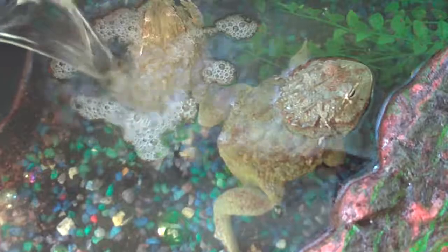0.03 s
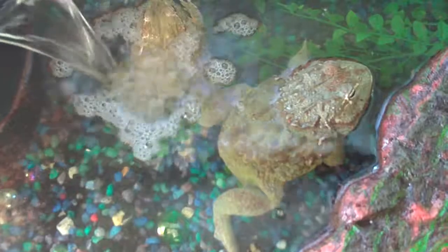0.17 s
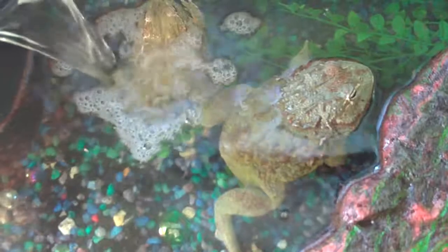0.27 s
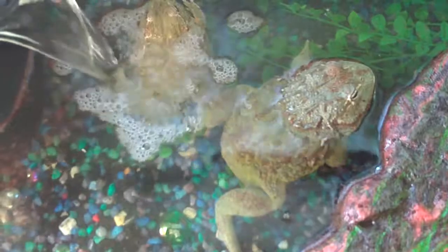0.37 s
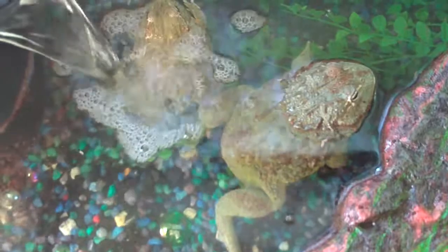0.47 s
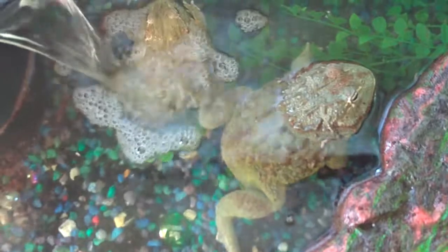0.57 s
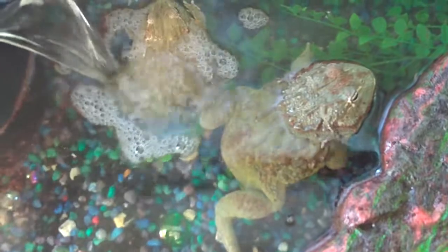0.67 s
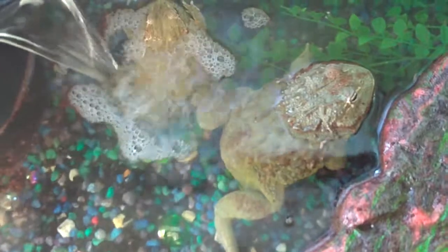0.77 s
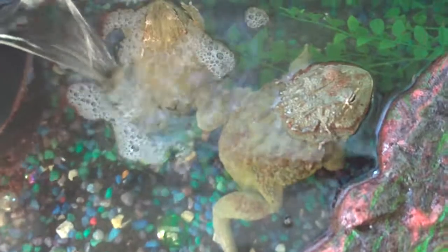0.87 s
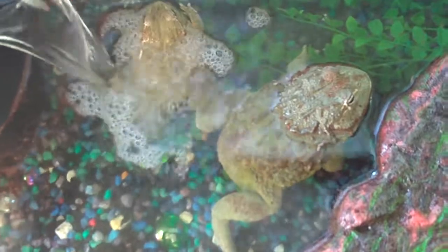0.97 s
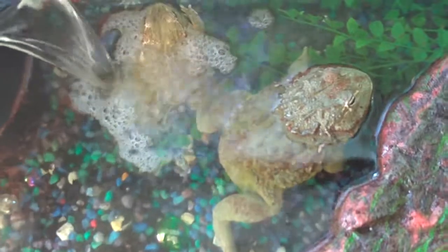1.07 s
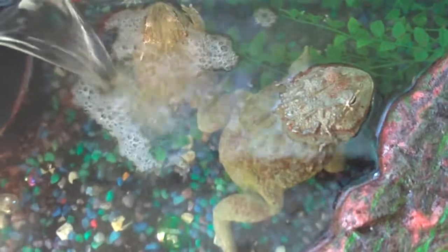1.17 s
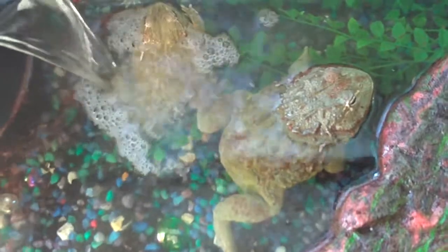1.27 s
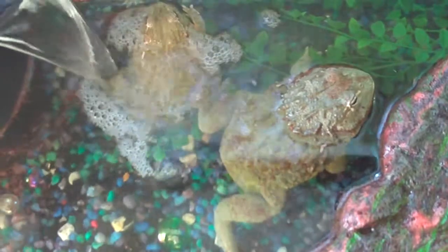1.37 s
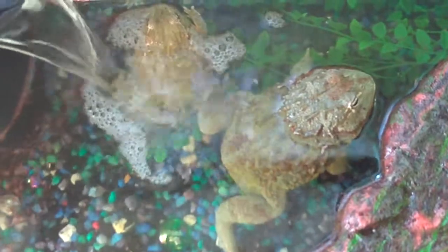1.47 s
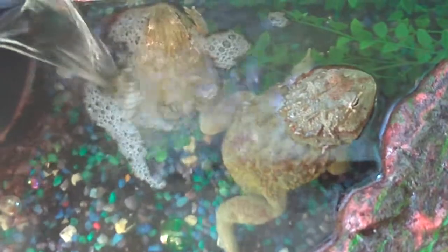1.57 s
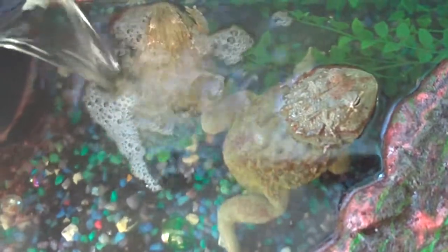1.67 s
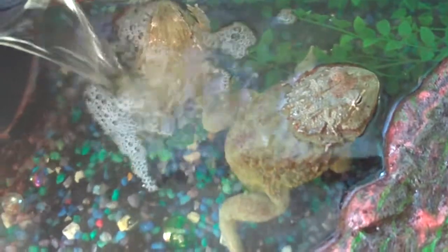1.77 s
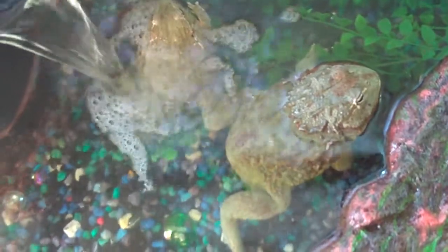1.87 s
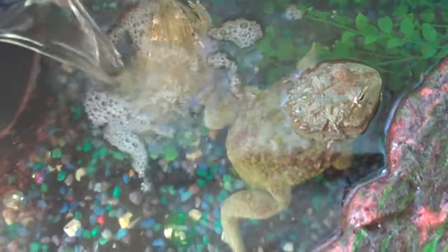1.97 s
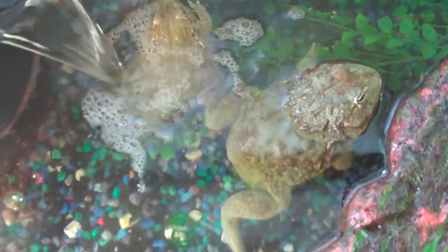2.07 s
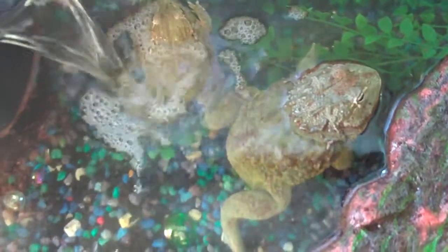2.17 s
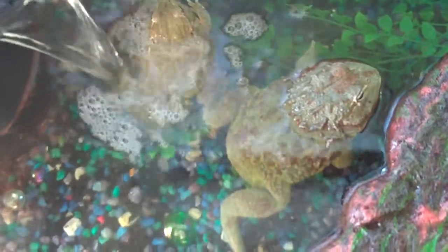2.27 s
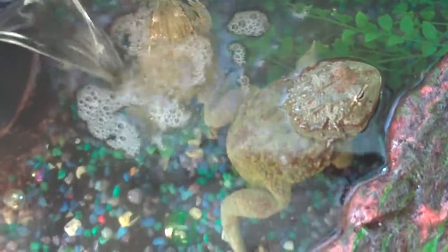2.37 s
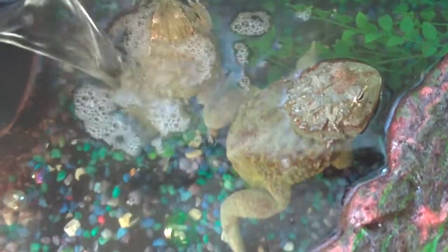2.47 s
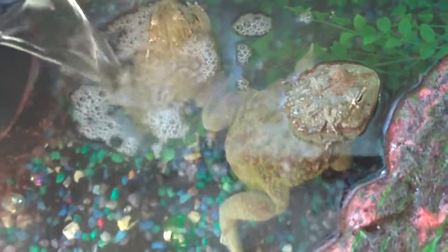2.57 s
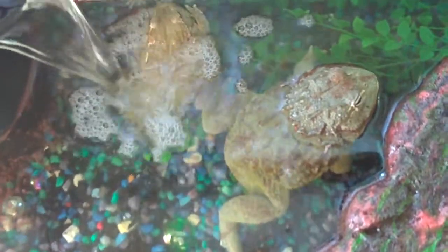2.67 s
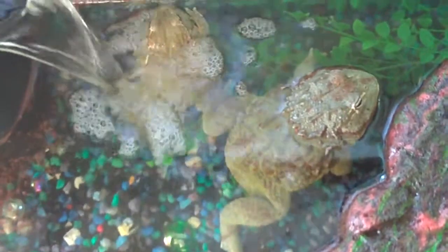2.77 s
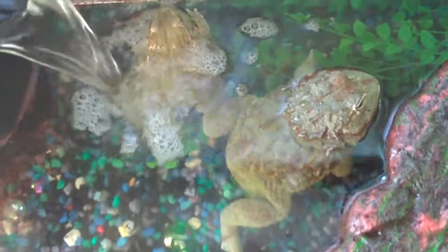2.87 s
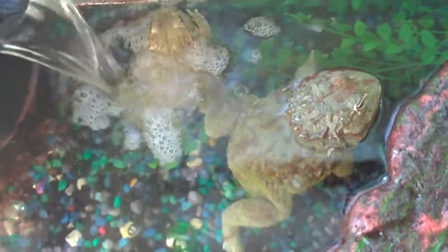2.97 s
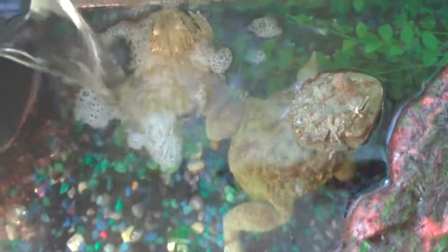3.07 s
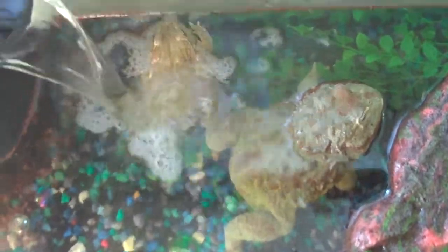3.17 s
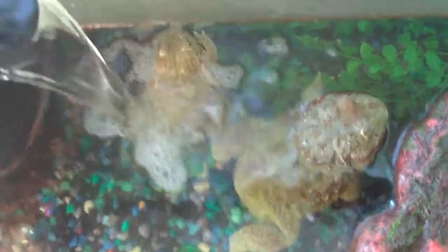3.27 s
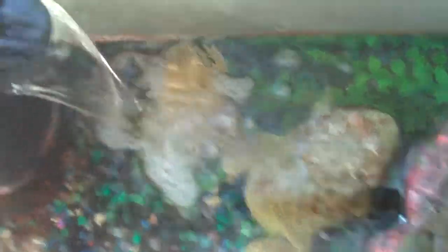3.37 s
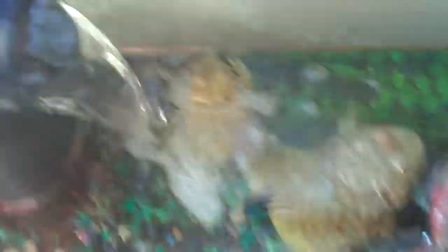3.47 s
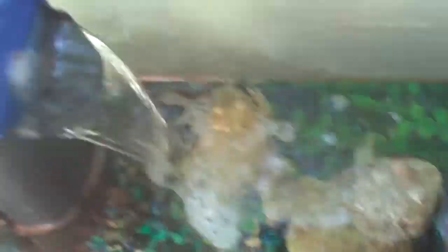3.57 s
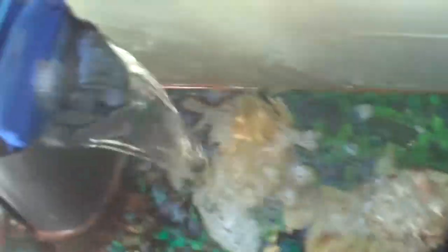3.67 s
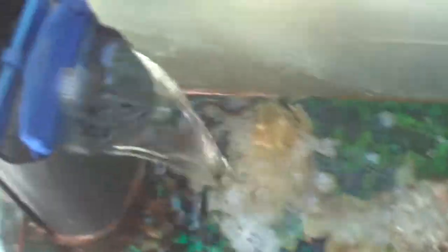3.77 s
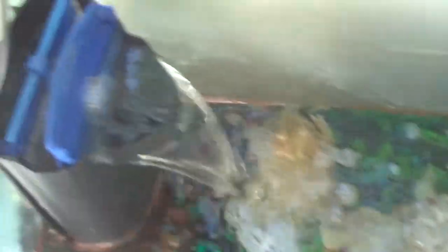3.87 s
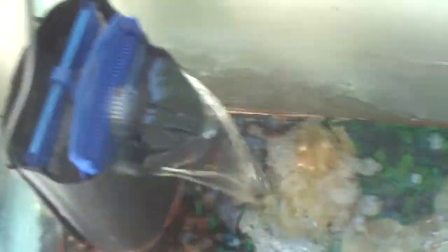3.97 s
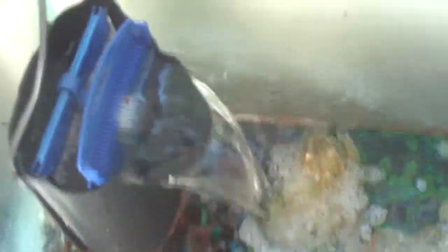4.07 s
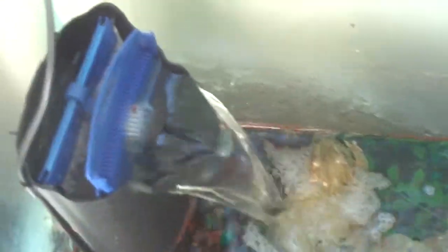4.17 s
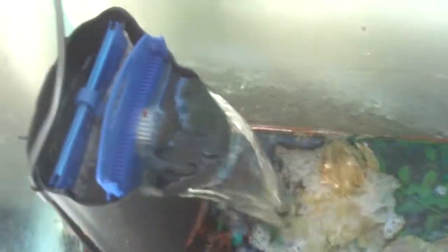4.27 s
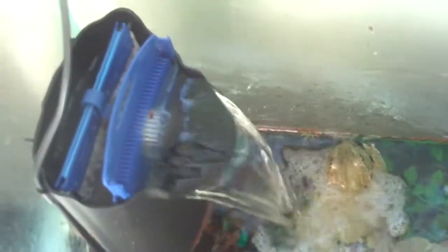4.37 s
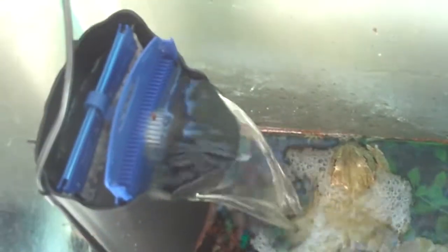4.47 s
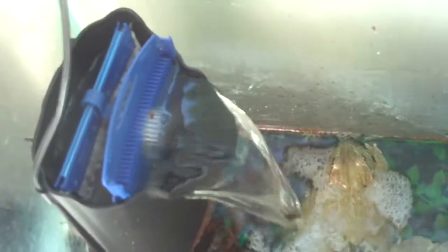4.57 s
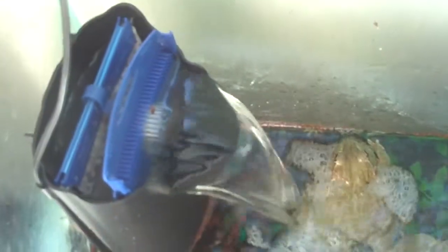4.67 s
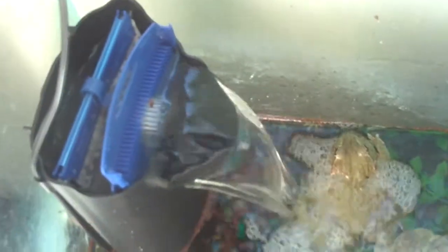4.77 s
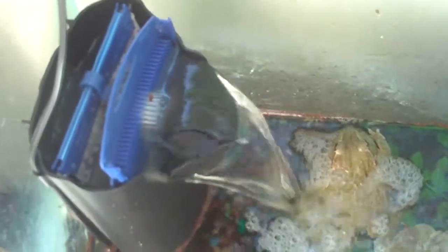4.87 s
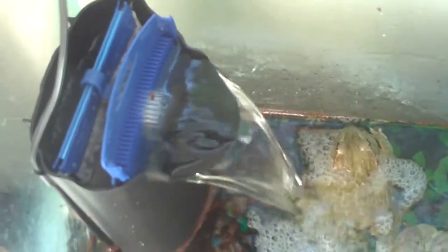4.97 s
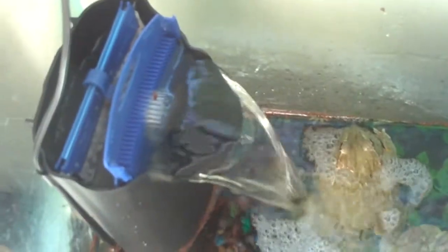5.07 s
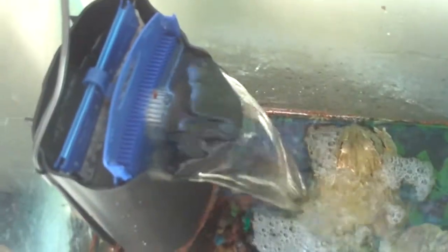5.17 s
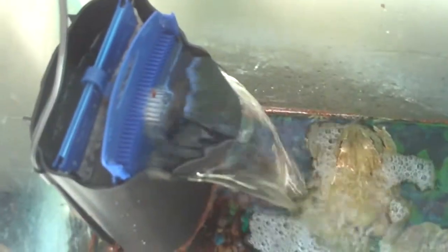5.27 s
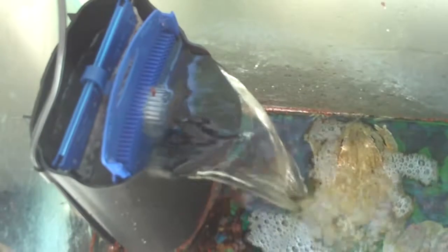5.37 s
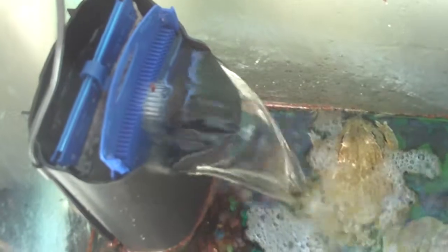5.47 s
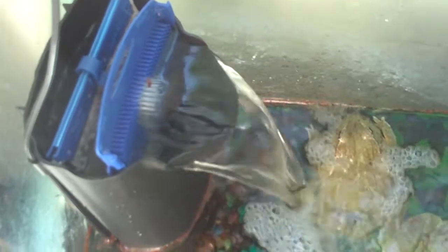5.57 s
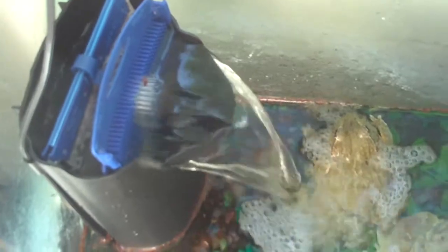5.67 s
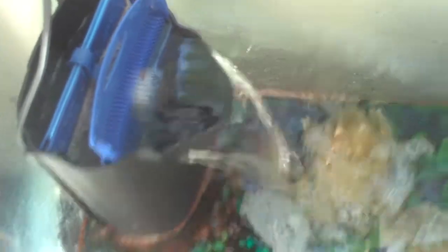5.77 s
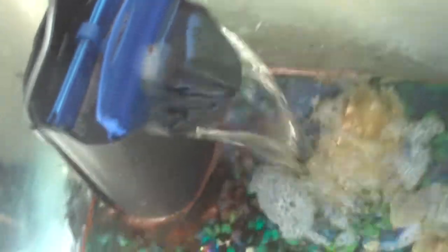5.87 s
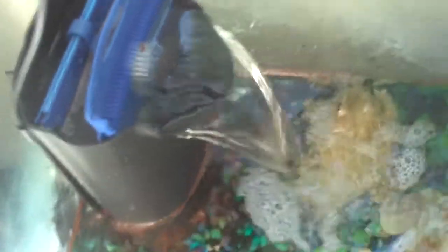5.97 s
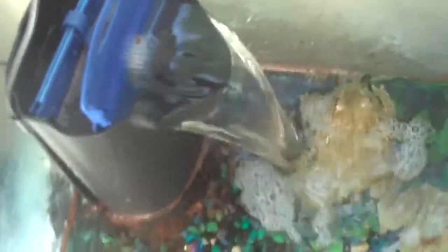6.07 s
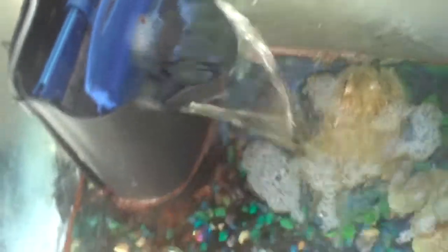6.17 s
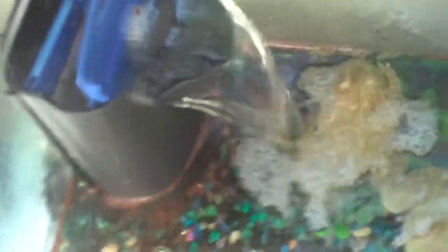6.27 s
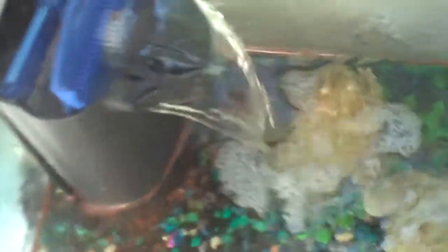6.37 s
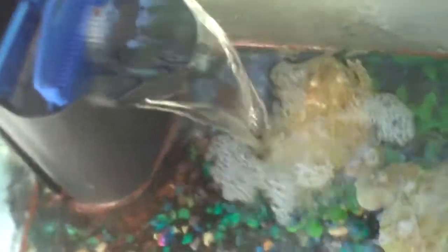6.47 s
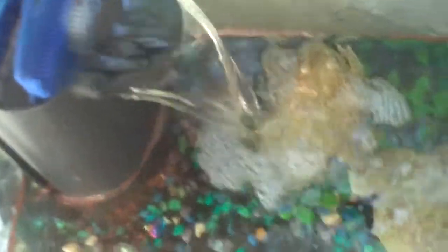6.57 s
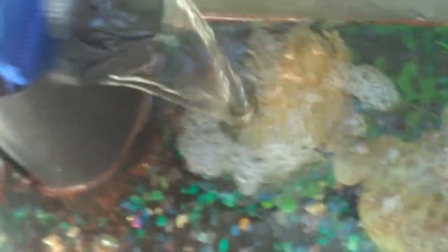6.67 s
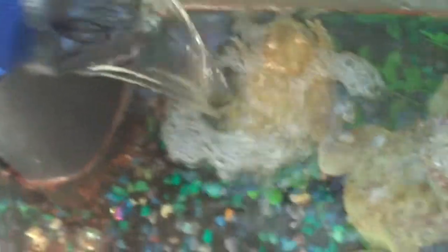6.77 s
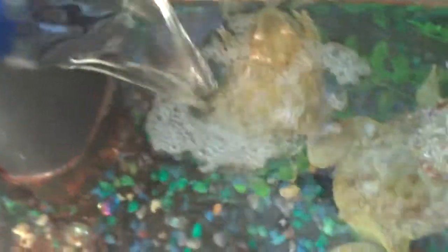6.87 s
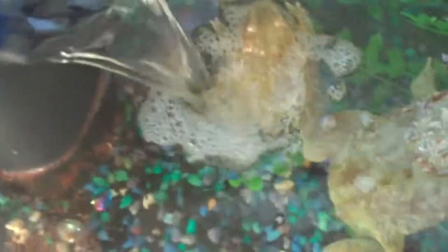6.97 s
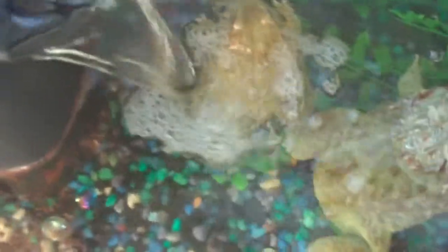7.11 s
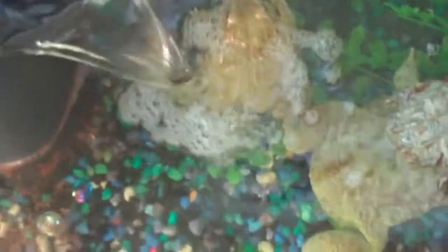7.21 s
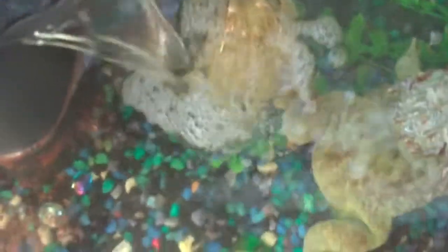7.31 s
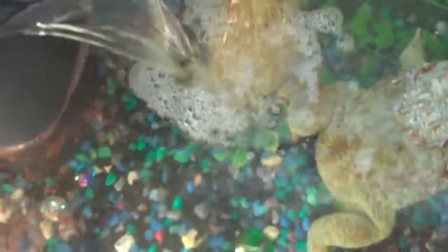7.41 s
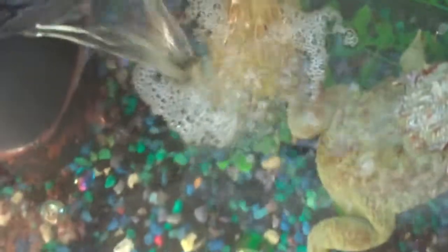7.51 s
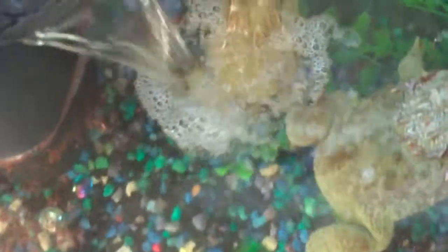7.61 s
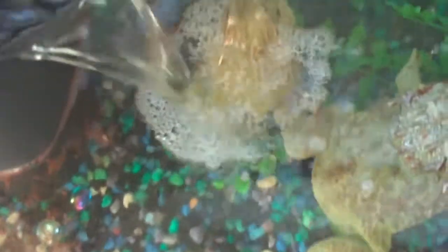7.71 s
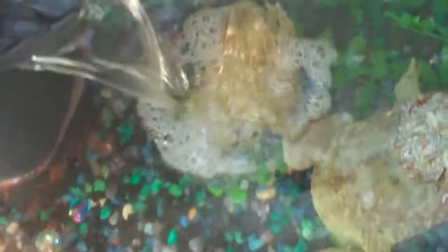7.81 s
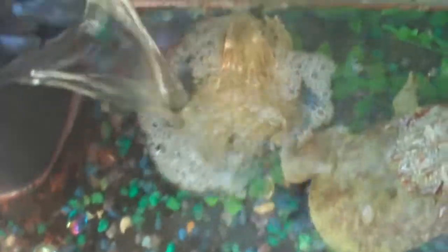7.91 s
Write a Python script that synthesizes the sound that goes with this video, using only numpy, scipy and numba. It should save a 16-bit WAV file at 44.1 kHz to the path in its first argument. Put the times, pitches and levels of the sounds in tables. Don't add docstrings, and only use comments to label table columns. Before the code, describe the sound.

A filter pours water without pause into a shallow glass tank. Close to a small microphone, bubbles of many sizes gurgle, plink and tick over a foamy churn, with short hollow echoes from the panes. A pump hums low beneath. Partway through, the microphone swings towards the filter and the water turns more ringing; later the pops grow louder and denser. The treble is dull and slightly ragged.

```python
import sys
import numpy as np
from scipy import signal
from scipy.fft import rfft, irfft, next_fast_len
from scipy.io import wavfile
from scipy.ndimage import uniform_filter1d
from numba import njit

SR = 44100
rng = np.random.default_rng(int(sys.argv[2]) if len(sys.argv) > 2 else 0)


def decibels_to_gain(level_db):
    exponent = np.asarray(level_db, float) / 20
    return 10 ** exponent


def put_to_file(sound):
    columns = np.atleast_2d(sound).T
    safe = np.clip(columns, -1, 1)
    whole_steps = np.round(safe * 32767)
    wavfile.write(sys.argv[1], SR, whole_steps.astype(np.int16))


N = 350397
T = np.arange(N) / SR


def unit(x):
    return x / np.sqrt(np.mean(x ** 2))


def colour(x, points, lo_hz, hi_hz, modes=()):
    size = next_fast_len(N)
    f = np.maximum(np.arange(size // 2 + 1) * SR / size, 1)
    points_hz, points_db = np.transpose(points)
    db = np.interp(np.log(f), np.log(points_hz), points_db)
    for hz, width, peak_db in modes:
        db = db + peak_db / (1 + (2 * (f - hz) / width) ** 2)
    band = 1 / np.sqrt((1 + (lo_hz / f) ** 16) * (1 + (f / hi_hz) ** 16))
    return unit(irfft(rfft(x, size) * decibels_to_gain(db) * band, size)[:N])


def walk(rate):
    k = int(SR / rate)
    held = np.repeat(rng.standard_normal(N // k + 1), k)
    slewed = uniform_filter1d(uniform_filter1d(held, k), k)
    return unit(slewed[:N])


def quick(x):
    return x - uniform_filter1d(x, size=SR // 5)


def towards_filter():
    # time in seconds, aim from 0 (pool) to 1 (filter).
    swing = [
        (0, 0.18),
        (3.3, 0.035),
        (4.1, 0.6),
        (6.0, 0.6),
        (7.9, 0.67),
    ]
    return np.clip(np.interp(T, *np.transpose(swing)), 0, 1)


@njit
def ring(n, start, hz, cycles, size, rise, glide):
    out = np.zeros(n)
    for e in range(len(start)):
        w = 2 * np.pi * hz[e] / SR
        length = int(cycles[e] * SR / hz[e])
        fall = np.exp(-5.8 / length)
        grow = np.exp(-1 / (rise * length))
        level, closed, phase = size[e], 1., 0.
        for i in range(start[e], min(start[e] + length, n)):
            out[i] += level * (1 - closed) ** 2 * np.sin(phase)
            level *= fall
            closed *= grow
            phase += w * (1 + glide * (i - start[e]) / length)
    return out


def panes(x, tail_db):
    # delay in seconds, level in dB.
    first_echoes = [(.0014, -15), (.0036, -14), (.0083, -21)]
    t60_s = .08
    t = T[:SR // 5]
    tail = rng.standard_normal(len(t)) * np.exp(-np.log(1000) * t / t60_s) * (t > .002)
    wet = signal.fftconvolve(x, tail / np.sqrt(np.sum(tail ** 2)))[:N]
    early = sum(decibels_to_gain(db) * np.roll(x, int(s * SR)) for s, db in first_echoes)
    return x + decibels_to_gain(tail_db) * wet + early


def gulps_db(hz):
    # time in seconds, swell in dB, pitch of the bubbles favoured in Hz.
    gulps = [(.13, 3.5, 4500), (.44, 2.5, 1200), (.66, 3, 4530), (.85, 6, 1170), (1.12, -2, 1710),
             (1.23, 0.5, 700), (1.56, -1.5, 2460), (2.22, -0.5, 800), (2.33, 4, 4500), (2.44, 0.5, 2000),
             (2.66, -2.5, 4000), (2.88, -0.5, 4500), (3.1, 3, 4500), (3.21, -2.5, 1610), (3.32, 6, 1720),
             (3.43, 3, 4500), (3.65, 1, 1690), (3.9, 6.5, 1370), (4.42, -1.5, 3000), (4.97, -3, 2570),
             (5.3, 1.5, 4460), (5.9, 5, 1400), (6.15, -5, 1300), (6.42, 2, 4500), (6.38, 3, 800),
             (6.55, 5, 800), (6.64, -3, 900), (6.69, 5, 900), (6.77, -3.5, 1700), (6.84, 2.5, 3000),
             (7.06, 2, 2500), (7.17, -2.5, 790), (7.24, 4, 4500), (7.4, 2.5, 4500), (7.7, -0.5, 910)]
    reach_s, reach_octaves = 0.051, 0.68
    s = T[::64]
    bumps = 0
    for at, db, favoured_hz in gulps:
        in_time = ((s - at) / reach_s) ** 2
        in_pitch = (np.log2(hz / favoured_hz) / reach_octaves) ** 2
        bumps = bumps + db * np.exp(-.5 * in_time - .5 * in_pitch)
    return np.interp(T, s, bumps)


def churn():
    # lowest Hz, highest Hz, births per second, cycles of ring, size scatter in dB,
    # smooth hiss in dB, burst depth in dB, swell as a share of the ring.
    bubble_sizes = [
        (408, 1283, 600, 16, 3, -8, 2.3, .2),
        (1295, 2318, 600, 23.6, 3.5, -11, 2.6, .17),
        (2384, 7400, 3400, 29, 5.5, -8, 4.4, .05),
    ]
    # level over the pool in dB, change towards the filter in dB.
    swarm_levels = [(-36, 3.2), (-43.3, 10.3), (-39.5, 1)]
    # time in seconds, level in dB against the usual flow.
    flow = [(.1, 0), (.9, -0.5), (1.7, 0.5), (2.5, -0.5), (3.3, -0.5), (4.1, -1.5), (4.9, 0), (5.6, -0.5),
            (6.2, 1), (6.8, 0.5), (7.4, 1.5), (7.9, 1)]
    # frequency in Hz, level in dB per Hz.
    pool_side = [(210, -33.5), (350, -3), (527, -10.5), (606, -3.5), (889, -9), (1010, -4.5), (1210, -9.5),
                 (1750, -8.5), (1890, -7), (2410, -11), (3190, -16.5), (4010, -13.5), (5380, -15),
                 (7400, -32), (9620, -73.5), (16300, -120)]
    filter_side = [(210, -35), (350, -6), (561, -12.5), (606, -8.5), (680, -17), (782, -9.5), (984, 4.5),
                   (1160, -13.5), (1640, -4.5), (2600, -15), (3310, -12.5), (3760, -17.5), (5310, -18.5),
                   (7400, -33), (9620, -62), (16300, -120)]
    # frequency in Hz, width in Hz, height in dB.
    pool_modes = [(1020, 90, 4.5), (1710, 250, 7), (2450, 80, 12.5), (3950, 27, -1.5), (5270, 68, 3),
                  (6260, 1000, 3)]
    filter_modes = [(1060, 48, 6.7), (1610, 46, 6.9), (1850, 110, 10), (3157, 60, 4), (3310, 90, 4),
                    (6210, 390, 7.1)]

    swing = towards_filter()
    flow_db = np.interp(T, *np.transpose(flow))
    burst = 0.85 * walk(15) + 0.57 * walk(28)
    water = 0
    for row, (db, turn_db) in zip(bubble_sizes, swarm_levels):
        lo, hi, rate, cycles, scatter_db, hiss_db, burst_db, rise = row
        when, pitch, small, long = rng.random((4, int(rate * N / SR)))
        start = (when * N).astype(np.int64)
        hz = lo * 0.8053 + (hi * 1.1176 - lo * 0.863) * pitch
        size = np.sqrt(hz) * decibels_to_gain(-scatter_db * np.log(1 - .9 * small))
        swarm = ring(N, start, hz, cycles * (.5 + long), size, rise, 0.21)
        hiss = decibels_to_gain(hiss_db) * rng.standard_normal(N) * np.sqrt(SR / 2 / (hi - lo))
        raw = unit(panes(swarm, -9)) + hiss
        over_pool = colour(raw, pool_side, lo, hi, pool_modes)
        at_filter = colour(raw, filter_side, lo, hi, filter_modes)
        heard = (1 - swing) * over_pool + swing * at_filter
        flutter_db = burst_db * quick(0.69 * burst + 0.5 * walk(18))
        level_db = db + turn_db * swing + flow_db + gulps_db(np.sqrt(lo * hi)) + 4.0 + flutter_db
        water = water + heard * decibels_to_gain(level_db)
    return water


def boom():
    # level over the pool in dB, change towards the filter in dB.
    boom_levels = [(-30, -1.5), (-33.5, 2)]
    # time in seconds, level in dB.
    load = [(.1, -1.5), (.6, 0.5), (1.1, -0.5), (2.3, 0.5), (3.3, 0), (4.4, -0.5), (5.3, -1.5), (6.1, -1),
            (7, 0.5), (7.9, 0)]
    # frequency in Hz, level in dB per Hz.
    boom_shape = [(9, -31.5), (20, -10), (86, 1.5), (140, -2.5), (152, -16), (170, -4.5), (248, -14),
                  (353, -13.5), (450, -11.5)]
    # frequency in Hz, width in Hz, height in dB.
    room_modes = [(57, 6, 7), (75, 6, 6), (97.9, 5, 7), (119, 6, 4), (135, 5, 6), (180.5, 5, 5),
                  (198, 7, 5)]
    swing = towards_filter()
    load_db = np.interp(T, *np.transpose(load))
    low_db, upper_db = (db + turn_db * swing + load_db for db, turn_db in boom_levels)
    low = colour(rng.standard_normal(N), boom_shape, 12, 154.4, room_modes)
    upper = colour(rng.standard_normal(N), boom_shape, 136.6, 401, room_modes)
    return low * decibels_to_gain(low_db + 4.0) + upper * decibels_to_gain(upper_db + 3.5)


def hum():
    # frequency in Hz, level in dB rms, wander in Hz.
    motor_lines = [(180, -36.8, .4), (240, -54, .8), (300, -51, .8), (322, -53, 1), (360, -45, .5),
                   (420, -49, .6), (440, -54, 1), (499, -51, .6), (600, -42.3, .5), (648, -53, 1),
                   (800, -48.5, 2), (960, -50, 1.5), (1020, -46.5, 1.5), (1600, -46.5, 1.5), (1970, -51, 2)]
    # frequency in Hz, level over the pool in dB rms,
    # change towards the filter in dB.
    drones = [(57, -39.5, -1), (75, -42, -1), (97.9, -34, -13), (120, -42, 1.5), (135, -39, -1),
              (200, -45, 1.5)]
    swing = towards_filter()
    lines = list(motor_lines) + [(hz, db + turn_db * swing, .4) for hz, db, turn_db in drones]
    tones = 0
    for hz, db, wander_hz in lines:
        phase = 2 * np.pi * np.cumsum(hz + wander_hz * walk(9)) / SR
        sway_db = 1.3 * walk(5.6)
        tones = tones + np.sqrt(2) * decibels_to_gain(db + sway_db) * np.sin(phase)
    return tones


def slaps():
    # time in seconds, peak in dB.
    slap_times = [(0.372, -17), (.911, -21.5), (1.172, -19), (1.288, -34), (2.042, -26), (2.0982, -23),
                  (2.1025, -14), (2.204, -20), (2.287, -28), (3.109, -21), (3.578, -16), (4.017, -23),
                  (4.029, -19.5), (4.1, -13), (5.232, -19), (5.451, -18), (6.067, -18), (6.4938, -15),
                  (6.5925, -12), (6.6053, -17), (6.7147, -17), (7.016, -16), (7.397, -20)]
    # frequency in Hz, level in dB per Hz.
    slap_colour = [(300, -15), (900, 0), (3000, -1.5), (5500, -8.5), (6500, -9), (7600, -30.5)]
    decay_s, strays_per_s, stray_db, stray_scatter_db = 0.0019, 40, -35, 5.5
    when, strength = rng.random((2, int(strays_per_s * N / SR)))
    s, db = np.transpose(slap_times)
    s = np.append(s, when * T[-1])
    db = np.append(db, stray_db - stray_scatter_db * np.log(1 - .85 * strength))
    hits = np.bincount((s * SR).astype(np.int64), decibels_to_gain(db), N)
    envelope = signal.lfilter([1], [1, -np.exp(-1 / (decay_s * SR))], hits)
    noise = colour(rng.standard_normal(N), slap_colour, 250, 9000)
    return panes(envelope * noise, -14)


def lone_bubbles():
    # time in seconds, peak in dB, pitch in Hz.
    plops = [(0.165, -27, 960), (0.373, -25, 620), (0.51, -23, 760), (0.836, -21, 1040), (1.174, -17, 732),
             (1.352, -23, 1020), (1.719, -25, 656), (1.854, -20, 1010), (1.883, -26, 608),
             (2.039, -27, 655), (2.205, -18.5, 937), (2.483, -18, 1040), (2.61, -18, 1040),
             (3.305, -20, 770), (3.339, -19, 799), (3.541, -21, 1020), (3.581, -14, 1255),
             (3.979, -20, 931), (4.205, -22, 999), (4.404, -21, 1030), (4.589, -25, 800), (4.737, -22, 980),
             (4.845, -18.5, 1000), (5.27, -26, 966), (5.331, -26, 1060), (5.371, -22, 1010),
             (5.482, -19, 1004), (5.764, -25, 960), (5.917, -18, 1110), (5.998, -13, 1015),
             (6.074, -21, 1040), (6.248, -24, 1010), (6.299, -23, 1030), (6.444, -19, 1080),
             (6.529, -24, 953), (6.58, -16, 1080), (6.604, -17, 800), (6.663, -20, 1040),
             (6.719, -12.5, 942), (6.898, -17, 1020), (6.94, -18, 833), (6.986, -21, 813),
             (7.014, -15, 980), (7.048, -25, 990), (7.103, -17, 985), (7.247, -22, 960), (7.34, -23, 1030),
             (7.378, -28, 1000), (7.4, -21, 1030), (7.448, -27, 950), (7.597, -21, 1080),
             (7.634, -19, 1040), (7.68, -20, 990), (7.693, -16, 976), (7.78, -22, 1030)]
    plips = [(0.4756, -25, 1380), (1.012, -19, 1710), (1.47, -17.5, 1710), (2.4875, -20.5, 1500),
             (3.5147, -19, 1700), (3.575, -20, 1300), (3.8649, -23, 1600), (4.024, -19, 1730),
             (4.154, -24, 1670), (4.241, -25, 1570), (4.307, -21, 1640), (4.69, -24, 1610),
             (4.7484, -16.5, 1710), (4.9539, -19, 1840), (5.1395, -22, 1700), (5.153, -22, 1610),
             (5.231, -16, 1690), (5.335, -24, 1400), (5.4538, -10.5, 1600), (5.5075, -20, 1400),
             (5.5815, -22, 1620), (5.668, -24, 1640), (5.9407, -14, 1950), (6.0504, -23, 1840),
             (6.109, -11.5, 1890), (6.1995, -20, 1670), (6.3018, -23, 1980), (6.4101, -21, 1870),
             (6.4495, -15, 1610), (6.4934, -20, 1410), (6.5852, -17, 1350), (6.683, -21, 1850),
             (6.7177, -6.5, 1830), (6.7992, -26, 1970), (6.8293, -14, 1710), (6.895, -22, 1820),
             (6.9663, -21, 1550), (7.0162, -21, 1660), (7.0477, -21, 2050), (7.072, -18, 1500),
             (7.1177, -17, 1600), (7.1818, -22, 1680), (7.2667, -15.5, 1680), (7.317, -24, 1530),
             (7.3383, -15.5, 1700), (7.3984, -10.5, 1660), (7.4333, -22, 2050), (7.491, -18, 1590),
             (7.6593, -21, 1570), (7.6897, -21, 1980), (7.6987, -19, 1450), (7.731, -19, 1610),
             (7.8533, -24, 1660)]
    plinks = [(0.1887, -23, 2630), (0.25, -23, 2440), (0.4057, -26, 2450), (0.541, -19, 2680),
              (0.5958, -22, 2870), (0.7949, -20, 2380), (0.8313, -23, 2450), (0.8916, -26.5, 2450),
              (0.9161, -24, 2820), (1.0095, -21, 2480), (1.2084, -26, 2700), (1.5851, -21, 2450),
              (1.7896, -28, 2440), (2.052, -26, 2450), (2.2271, -30, 2660), (2.2371, -24, 2900),
              (2.238, -26, 2840), (2.258, -24, 2400), (2.348, -21, 2420), (2.4391, -27, 2350),
              (2.6013, -17.5, 2450), (2.957, -24, 2520), (3.117, -28, 2390), (3.2114, -24, 2460),
              (3.4085, -25, 2440), (3.577, -16.5, 3140), (3.6519, -28, 2570), (3.651, -23.5, 2300),
              (3.8584, -21, 2530), (3.9741, -24, 2250), (4.016, -19, 3220), (4.0804, -22, 2320),
              (4.0999, -22, 2430), (4.1914, -26, 3060), (4.276, -24, 3100), (4.3423, -27, 2250),
              (4.6601, -31, 2300), (5.0193, -23, 2210), (5.2577, -26, 3090), (5.4493, -21, 2520),
              (6.0998, -18, 2230), (6.4936, -20, 2590), (6.5912, -21, 3300), (6.6062, -20, 2240),
              (6.6411, -19, 2270), (6.7144, -18, 2200), (6.7967, -26, 2310), (6.896, -16.5, 2300),
              (6.9374, -18.5, 3400), (6.9828, -22, 3020), (7.0706, -21, 2390), (7.228, -21, 3300),
              (7.355, -18, 3320), (7.5071, -26, 2190), (7.771, -24, 3030)]
    ticks = [(0.3693, -26, 5300), (0.5484, -21, 4290), (0.6372, -23, 5000), (0.7485, -20, 3900),
             (0.9091, -18.5, 3900), (0.948, -20, 4580), (1.0682, -24, 4650), (1.2409, -26, 5000),
             (1.2877, -14, 5270), (1.3516, -24, 5370), (1.4604, -20, 5360), (1.5207, -25.5, 5000),
             (1.6644, -29, 5260), (1.6993, -23, 4680), (1.8719, -27, 5190), (1.9258, -23, 4980),
             (2.0176, -22, 5300), (2.042, -21, 5040), (2.2336, -28, 4470), (2.2865, -23, 5010),
             (2.3059, -16, 5200), (2.5274, -26, 4600), (2.6841, -23, 4480), (2.8846, -22, 5270),
             (3.1091, -15.5, 4540), (3.138, -19, 4680), (3.1964, -24, 4830), (3.3366, -19, 4370),
             (3.5775, -27, 4000), (3.6604, -24, 5630), (3.8484, -25, 4380), (4.0155, -24, 3780),
             (4.0989, -25, 4460), (4.5648, -24, 4410), (4.6551, -24, 5110), (4.8292, -29, 4450),
             (5.0632, -22, 5130), (5.2098, -21, 4320), (5.2672, -22, 4940), (5.7047, -29, 4800),
             (5.9287, -20, 4060), (6.0504, -28, 4640), (6.0684, -18, 5130), (6.1876, -29, 4880),
             (6.2604, -15, 4900), (6.3827, -25, 4370), (6.4176, -27, 4700), (6.4355, -24, 3790),
             (6.5927, -22, 3710), (6.6052, -23.5, 4320), (6.6545, -28, 4710), (6.7508, -19, 5320),
             (7.1589, -23, 5900), (7.2208, -22, 4620), (7.3614, -22, 4550), (7.3879, -23, 4300),
             (7.4577, -20.5, 4370), (7.6268, -22, 5260), (7.7211, -14, 5540)]
    # time in seconds, peak in
    # dB, pitch in Hz, cycles of ring.
    splats = [(2.0988, -12, 3920, 8), (2.0987, -12, 2820, 6), (2.1025, -7.5, 2600, 9),
              (2.1024, -3, 4130, 16), (3.579, -18.5, 780, 12), (4.0278, -16.5, 3220, 12.5),
              (4.1008, -17, 860, 6), (4.1012, -6, 1200, 10), (4.1055, -15, 1300, 5), (5.466, -21, 1600, 80),
              (5.4532, -12, 1940, 28), (6.545, -24, 810, 70), (6.565, -23, 1040, 50),
              (6.695, -21, 1060, 45), (6.5925, -11, 1350, 9), (6.726, -13, 1790, 16)]
    # time in seconds, peak in dB, pitch in Hz.
    blips = [(0.1153, -25.5, 4410), (0.1323, -27.5, 5240), (0.1982, -27.0, 990), (0.2182, -23.5, 990),
             (0.4156, -26.5, 1540), (0.5609, -27.5, 2760), (0.7361, -26.5, 1050), (0.8467, -25.5, 990),
             (0.8759, -22.0, 1100), (0.9147, -26.5, 1050), (0.9214, -25.5, 4130), (1.1991, -25.5, 1050),
             (1.2299, -26.5, 990), (1.247, -22.5, 1050), (1.2719, -27.0, 1050), (1.4345, -27.5, 1050),
             (1.5867, -26.5, 1320), (1.656, -27.5, 1050), (1.6941, -27.0, 2040), (1.9432, -23.5, 5020),
             (1.9693, -26.5, 1050), (2.0979, -24.5, 5900), (2.1019, -22.5, 5350), (2.2355, -26.0, 4470),
             (2.3723, -26.5, 990), (2.3731, -25.5, 3860), (2.4898, -26.0, 660), (2.4961, -23.0, 1050),
             (3.1095, -23.0, 5020), (3.1104, -22.5, 4080), (3.2984, -27.0, 2040), (3.3143, -27.0, 1050),
             (3.3425, -25.0, 2430), (3.4062, -25.5, 2090), (3.4518, -27.5, 990), (3.5139, -26.5, 2040),
             (3.5402, -27.0, 1320), (3.5781, -24.5, 2760), (3.6614, -26.5, 5680), (3.6733, -27.5, 990),
             (4.0517, -22.0, 2040), (4.1014, -20.5, 1760), (4.8017, -22.0, 1600), (5.1539, -22.0, 1650),
             (5.9403, -16.5, 1820), (6.0298, -21.0, 940), (6.0551, -21.5, 1930), (6.0748, -15.5, 5130),
             (6.2495, -22.0, 990), (6.2995, -21.5, 1050), (6.5838, -19.0, 1870), (6.6157, -21.0, 1710),
             (6.6644, -22.0, 940), (7.0147, -20.5, 990), (7.0646, -22.5, 990), (7.071, -20.5, 2320),
             (7.3628, -20.5, 4580), (7.5146, -22.5, 990), (7.6791, -21.5, 940), (7.7012, -20.5, 990)]
    rows = list(splats)
    for group in (plops, plips, plinks, ticks, blips):
        rows += [(s, db, hz, 15 + 2.8 * hz / 1000) for s, db, hz in group]
    return np.transpose(rows)


POP_DB, POP_RISE = 21.3, 0.28


def single_bubbles():
    s, db, hz, cycles = lone_bubbles()
    lead_s = .14 * cycles / hz
    start = ((s - lead_s) * SR).astype(np.int64)
    body = ring(N, start, hz * 0.983, cycles, decibels_to_gain(db + POP_DB), POP_RISE, .06)
    snap_start = (s * SR).astype(np.int64)
    snap = ring(N, snap_start, 2600 + .5 * hz, np.full(len(s), 2.5), decibels_to_gain(db - 9), .08, .3)
    return panes(body + snap, -14)


def broods():
    s, db, hz, cycles = np.repeat(lone_bubbles(), 4, axis=1)
    late, small, pitch = rng.random((3, len(s)))
    start = ((s - .005 + .02 * late) * SR).astype(np.int64)
    db = np.minimum(db, -16)
    db = db + POP_DB - 10 - 7 * np.abs(late - .35) - 4 * small
    hz = hz * np.exp(.2 * (2 * pitch - 1))
    return panes(ring(N, start, hz, .75 * cycles, decibels_to_gain(db), POP_RISE, .1), -14)


def scene():
    return (churn() + boom() + hum() + slaps() + single_bubbles() + broods())[None]


def thrifty_recorder(x):
    # frequency in Hz, step in dB against the mean level there.
    thrift = [(1500, -34), (2600, -19), (3500, -11), (4300, -13), (5200, -9), (5700, -3), (6800, 8),
              (7100, -2), (7450, 13)]
    scatter_db = 7
    frame = dict(fs=SR, window="cosine", nperseg=2048, noverlap=1024)
    f, _, z = signal.stft(x, **frame)
    band = np.arange(len(f)) // 6
    chance = rng.standard_normal((band[-1] + 1, z.shape[1]))[band]
    mean = np.sqrt(uniform_filter1d(np.mean(np.abs(z) ** 2, axis=1), size=30))[:, None]
    step_db = np.interp(f, *np.transpose(thrift))[:, None] + scatter_db * chance
    treble = f > 3000
    busy = np.median(np.abs(z[treble][:150]) / mean[treble][:150], axis=0) / .7
    heard = np.abs(z) > mean * busy ** .3 * decibels_to_gain(step_db)
    return signal.istft(z * heard, **frame)[1][:N]


def roll_off(x):
    return signal.sosfilt(signal.butter(12, 15800, fs=SR, output="sos"), x)


def record(dry):
    # time in seconds, gain in dB.
    opening = [(0, -93), (.038, -78), (.05, -20.5), (.06, -39), (.071, -43), (.076, -14.5), (.097, -12.5),
               (.103, -3)]
    click_s, click_db = 5.3902, -17.5
    x = thrifty_recorder(dry[0])[None] * decibels_to_gain(np.interp(T, *np.transpose(opening)))
    top_cut = signal.ellip(12, .3, 90, 7600, fs=SR, output="sos")
    x = signal.sosfilt(top_cut, x)
    settling = np.exp(-np.maximum(T - click_s, 0) / 0.0013)
    x = x + decibels_to_gain(click_db) * (T >= click_s) * settling
    return roll_off(x)


dry = scene()
out = record(dry)
put_to_file(out)
```